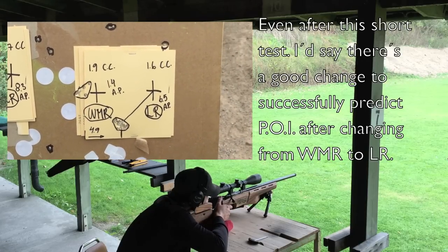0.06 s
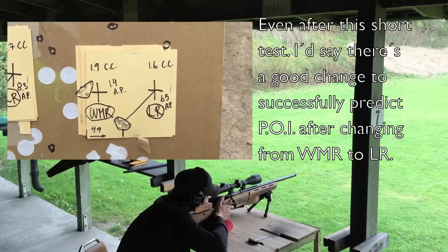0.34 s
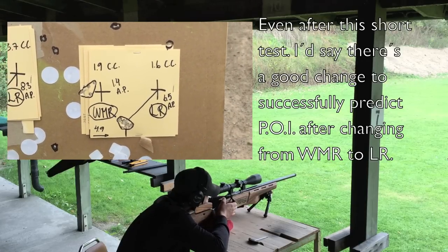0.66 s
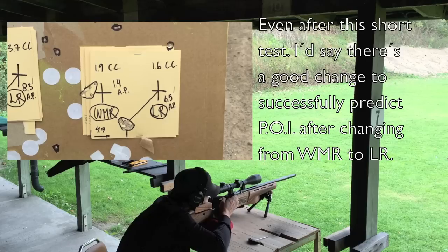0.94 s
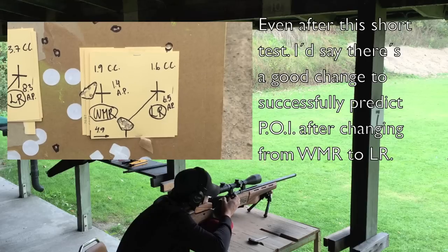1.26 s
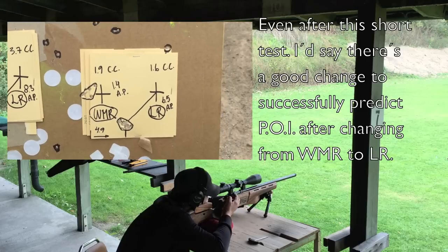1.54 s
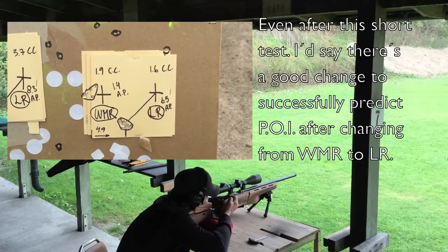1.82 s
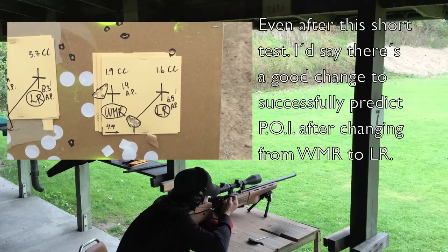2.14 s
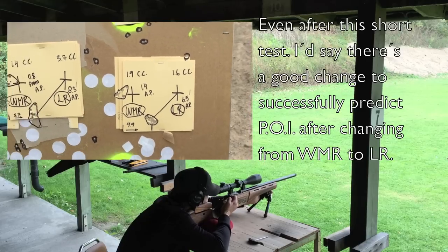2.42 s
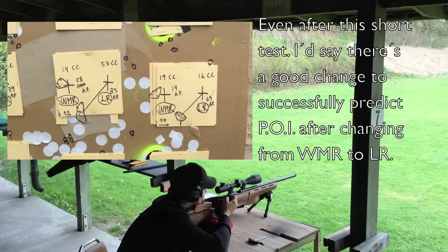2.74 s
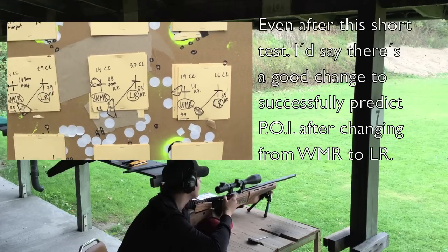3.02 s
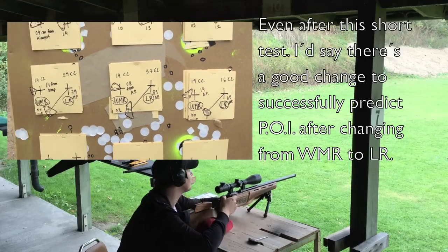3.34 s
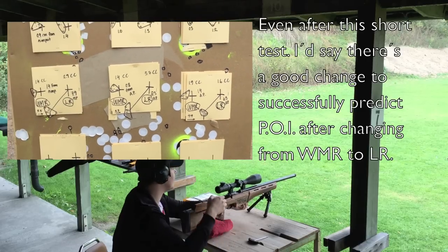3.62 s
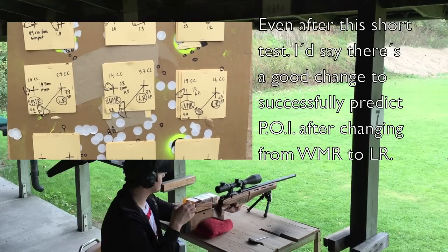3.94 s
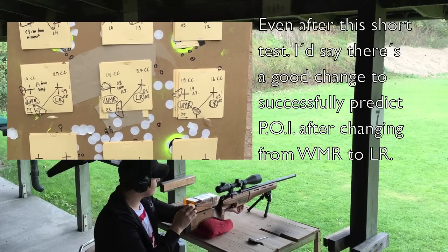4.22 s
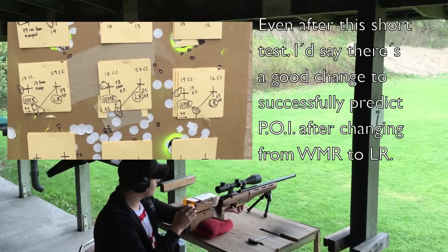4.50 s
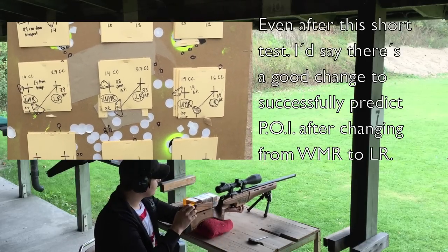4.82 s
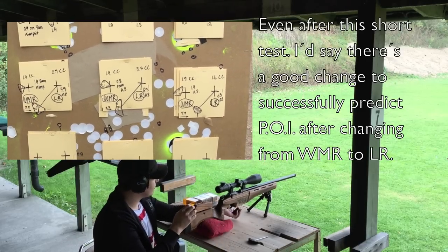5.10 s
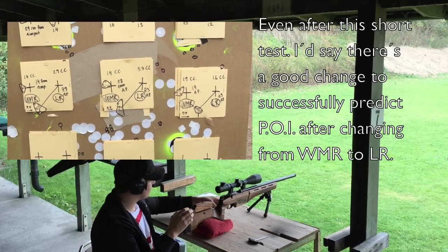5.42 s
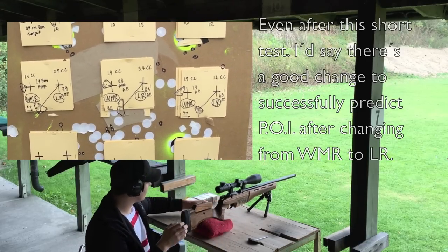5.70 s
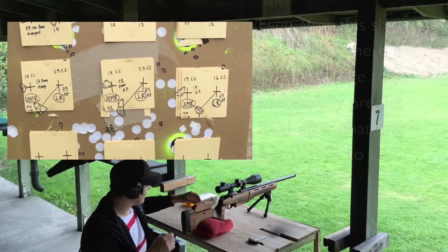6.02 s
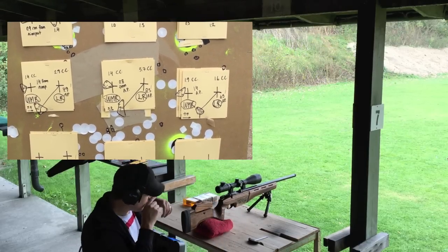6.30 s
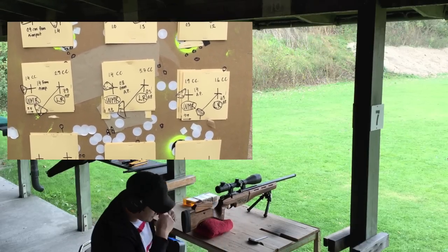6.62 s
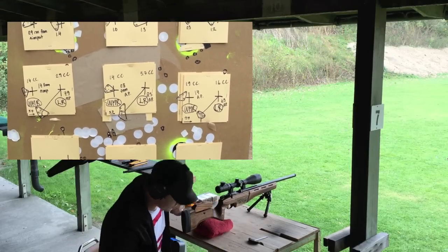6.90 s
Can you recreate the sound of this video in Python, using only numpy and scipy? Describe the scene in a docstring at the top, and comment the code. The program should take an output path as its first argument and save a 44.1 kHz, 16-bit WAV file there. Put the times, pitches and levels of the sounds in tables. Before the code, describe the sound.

A small-bore rifle closes with crisp metal clicks and fires once, its crack trailing over an open field as a fainter impact comes back. The bolt opens with light, high jingles, followed by soft cartridge ticks and ringing magazine clicks. A firm knock on wood comes next, and last a sleeve rustles and a chair thuds and scrapes. A quiet outdoor rumble runs underneath, heard from near the sheltered bench.

```python
"""One shot from a small-bore bolt rifle on a bench under the roof of an outdoor range.
An earlier shot's echo fades over a low, steady rumble. The stock slides on its sandbag and steel parts
click shut. The shot cracks, and the bullet smacks into the far backstop. The bolt opens with a thin ring,
a squeak and light jingles. Cartridges tick, the magazine clicks and something is put down on the bench.
Last, a sleeve brushes past and a chair scrapes over concrete as the shooter gets up."""
import sys
import numpy as np
from scipy import signal
from scipy.fft import rfft, irfft, next_fast_len
from scipy.io import wavfile
from scipy.ndimage import map_coordinates

SR = 44100
rng = np.random.default_rng(int(sys.argv[2]) if len(sys.argv) > 2 else 0)


def inscribe(sig):
    """Save sig as 16-bit PCM at rate SR to the path in sys.argv[1].

    A 1-D sig is mono; a 2-D sig holds one channel per row.
    Samples are clipped to [-1, 1] before scaling.
    """
    pcm = np.round(np.clip(np.atleast_2d(sig).T, -1, 1) * 32767)
    wavfile.write(sys.argv[1], SR, pcm.astype(np.int16))


N = 311076
TIME = np.arange(N) / SR
TAIL_SAMPLES = 2 ** 16

# Hits on each object. Each row: start in seconds, level in dB, chatter time in seconds,
# bass change in dB, treble change in dB, amount of ringing, room sound in dB relative to the hit.
SHOT_HITS = [(1.7546, -13.5, 0.0056, 0, 3, 1, -2)]
BACKSTOP_HITS = [(2.0719, -27, 0.0034, 0, 0, 0.49, 0)]
ACTION_HITS = [(.8205, -51.5, 0.0062, 3.5, -10, 0.48, -2.5), (.945, -61, 0.014, 7, -18.5, 0.81, 2),
               (.975, -35, 0.0071, -6, -3.5, 1, -5.5), (.9797, -23.5, 0.00046, -1, 3, 0.94, -2.5),
               (.9822, -23, 0.0008, 2.5, 1, 0.97, -2), (1.7127, -48.5, 0.013, 0.5, -5.5, 1, 2),
               (1.7265, -34.5, 0.0046, 0, -12.5, 0.41, 4)]  # the action is the rifle's moving steel parts
CATCH_HITS = [(1.1001, -39, .004, 0.006, 9.5, 0.53, -1.5), (1.1035, -40, .002, 0, -4, 0.96, -4.5)]
BOLT_HITS = [(2.6137, -31, 0.00062, -1, -10, 0.46, -0.5), (2.617, -36, 0.0009, -2, 22, 0.52, 12.5),
             (2.626, -33, 0.0029, -5, 16, 0.63, -4), (2.904, -38, 0.00023, -23, -21, 2.1, -2),
             (3.0288, -48.5, 0.0013, -12, -20, 2.9, -1), (3.0492, -58, 0.0019, 8, -43, 2.7, 5.5),
             (3.1315, -47.5, 0.0015, -23, -7, 0.7, 3), (3.2, -59.5, .07, -5, -11, 0.28, 7.5)]
CARTRIDGE_HITS = [(4.6595, -56.5, .008, 3, 3.5, .7, 0), (4.686, -57.5, 0.0093, 10, -51, 1.3, 0),
                  (4.834, -63.5, 0.019, 14, 3, 0.8, 3), (4.8676, -59, 0.0023, -10, 1, 1.7, -1),
                  (4.881, -56, .004, -24, -9, 1.8, -3.5), (4.9414, -61.5, 0.0046, -4, -8, 0.9, 2)]
MAGAZINE_HITS = [(4.9696, -37.5, 0.00049, -11.5, -4.5, 1.71, 1.5),
                 (4.9723, -33.5, 0.0034, -2.5, 18, 3.3, -5)]
FOLLOWER_HITS = [(5.0427, -43, .001, -0.016, 0, 1, 0), (5.0725, -42, .0015, -1, 0, 0.99, -6.5)]  # the follower is the plate on the magazine spring
BENCH_HITS = [(3.636, -60, 0.0076, 17.5, -17, 0.93, -4), (5.7846, -43.5, 0.0037, 13, -1.5, 0.84, 3),
              (5.797, -45.5, 0.0025, 17, -12.5, 1, 6.5), (5.8389, -37.5, 0.037, 17, -11, 1, -1.5),
              (5.8823, -21, 0.00082, -20, -24, 0.39, -6), (5.8845, -26, 0.0028, 8.5, 1.5, 0.7, 3),
              (6.842, -58, 0.017, 19, -5, 0.34, -4)]  # wood, from bench top to chair leg

# The notes each object rings at. Each row: pitch in Hz, width in Hz, boost in dB at a ringing amount of 1.
BARREL_NOTES = [(826.3, 95, 4.5), (1083, 82, 6.5), (1790, 40, 5), (1917, 78, 4.5), (2440, 110, 4.5),
                (2590, 60, 4.5), (3300, 35, 2.5), (4317, 40, 7.5), (4500, 31, 7.5), (6360, 48, 5)]
BACKSTOP_NOTES = [(558, 32, 4.9), (915, 78, 7.7), (2130, 160, 1.1), (2684, 110, 5.2), (5250, 89, 3.9),
                  (6400, 400, 3.8), (11150, 68, 27)]
ACTION_NOTES = [(630, 35, 9.9), (1780, 230, 7.8), (2149, 60, 3), (3060, 160, 6.5), (3580, 130, 3),
                (4440, 180, 4)]
CATCH_NOTES = [(2320, 150, 5), (3450, 200, 5.1), (4440, 150, 4), (5974, 350, 11), (7430, 300, 4.8)]
BOLT_NOTES = [(1730, 76, 9.4), (2370, 46, 2.2), (3074, 88, 9.4), (9200, 310, 8.2), (11300, 28, 12)]
CARTRIDGE_NOTES = [(1695, 100, 8.4), (4130, 290, 7.2), (4600, 140, 7.1), (5960, 150, 7.3), (7100, 340, 3.3)]
MAGAZINE_NOTES = [(1048, 44, 7.7), (1363, 29, 11.8), (2590, 69, 14), (2710, 50, 3.4), (2990, 51, 11.7),
                  (4070, 130, 5.6), (5200, 130, 6.7), (6760, 200, 5.2)]
FOLLOWER_NOTES = [(646, 32, 19), (1915, 26, 13.7), (4390, 225, 5.26), (8440, 320, 5.6), (10900, 60, 11)]
BENCH_NOTES = [(316, 43.2, 4.9), (524, 68, 1.3), (802, 31, 3.9), (1210, 60, 2), (1390, 60, 1.1),
               (2341, 90, 3), (2780, 100, 1.6), (4390, 235, 10.2), (8070, 350, 4.3), (11260, 340, 12.8)]
# The chair frame's notes and the far hums. Each row: pitch in Hz, width in Hz, base level in dB.
CHAIR_NOTES = [(250, 22, 8), (530, 42, 0), (1130, 61, -1), (1970, 180, 1.5), (2580, 90, -23)]
HUM_NOTES = [(71.34, 11, -57.5), (201.5, 7.3, -59.5)]

# The tone of each source, from bass to treble. Each row: frequency in Hz, relative level in dB.
SHOT_TONE = [(120, -30.5), (200, -22), (450, -19), (700, -15.5), (1080, -8), (1450, -12.5), (1950, 0),
             (2600, -4), (3500, -7.5), (8000, -9.5), (12000, -12), (15500, -14.5)]
BACKSTOP_TONE = [(210, -30), (350, -19), (474, -28), (539, -13.5), (643, -17), (928, -13), (1120, -11.5),
                 (1300, -8.5), (2170, -5), (3130, -11), (5220, -11), (9590, -34.5), (11400, -27),
                 (14800, -29), (16000, -34)]
ACTION_TONE = [(200, -33.5), (350, -12.5), (480, -24.5), (640, -12.5), (850, -14), (1300, -6.5),
               (1800, -6.5), (2700, -11.5), (3400, -6), (5000, -11), (7000, -7.5), (10500, -10),
               (15500, -8)]
CATCH_TONE = [(880, -46), (1500, -18), (2160, -1), (2830, -9), (3380, -0.5), (4920, -12.5), (6060, -4),
              (14800, -19.5), (16000, -32)]
BOLT_TONE = [(410, -40), (700, -29), (841, -25), (934, -44), (1020, -29), (1770, -22), (2990, -6.5),
             (3370, -10), (4920, -14), (14800, -1), (16000, 8)]
CARTRIDGE_TONE = [(500, -35), (1000, -5), (1800, 0.5), (2600, -3), (4500, -5.5), (9000, -14.5),
                  (15500, -19)]
MAGAZINE_TONE = [(400, -51), (650, -20.5), (850, -16.5), (1250, 2.5), (1650, -2), (2000, -2.5),
                 (2800, -7.5), (3500, -11.5), (4500, -9.5), (7000, -23.5), (10400, -19), (15500, -38)]
FOLLOWER_TONE = [(450, -32.5), (650, -14), (850, -14.5), (1200, 7), (2000, 0), (3200, -6), (4500, -2.5),
                 (8500, -12), (15500, -22)]
BENCH_TONE = [(120, -35), (220, -9.5), (400, -14), (750, -12), (1080, -6), (1450, -1.5), (2100, -0.5),
              (3100, -3.5), (4200, -10), (5200, -13), (8000, -16), (11300, -23), (15500, -22)]
STOCK_TONE = [(350, -23), (600, -4), (800, -2), (1100, -1.5), (1700, -5), (2600, -13.5), (6000, -24.5),
              (12000, -45.5)]
SLEEVE_TONE = [(290, -34), (500, -14), (604, 1), (946, -6), (1030, -2), (6060, -13.5), (14700, -17),
               (16000, -18)]
SCRAPE_TONE = [(88, -31), (150, 2), (240, -2.5), (297, -4.5), (398, -9), (790, -15.5), (1140, -18),
               (1630, -16), (1790, -15), (3350, -15), (11900, -39), (14800, -55), (16000, -59)]
RUMBLE_TONE = [(20, -28), (32, -13), (42, 0.5), (60, 2), (76, 3.5), (100, -3.5), (130, -8.5), (170, -24),
               (260, -39.5), (420, -90)]
DRONE_TONE = [(88, -34.5), (150, -9.5), (172, -20), (182, -14), (195, -1.5), (222, 0), (303, 2.5),
              (339, -7), (438, -21), (520, -28), (680, -57), (1140, -120)]
AIR_TONE = [(260, -33), (450, -8.5), (607, -1), (818, -5.5), (1010, -5.5), (1890, -7.5), (2070, -8),
            (4430, -13.5), (5790, -15), (10400, -18.5), (13400, -21), (15300, -20.5), (16000, -40.5)]
ECHO_TONE = [(240, -54), (400, -0.5), (515, -6), (654, -0.5), (770, -1.5), (2420, -0.5), (3510, -4),
             (6960, -19), (10900, -37), (14000, -68)]

# Sounds that swell and fade smoothly. Each row: middle in seconds, level in dB, half length in seconds.
BOLT_SQUEAK = [(2.986, -61.5, 0.017)]
STOCK_SLIDES = [(.45, -64.5, 0.049), (.79, -71.5, 0.063), (3.3, -73, 0.14), (3.498, -62.5, 0.065)]
SLEEVE_BRUSHES = [(6.655, -67, 0.09), (6.752, -57.5, 0.027), (6.825, -67, 0.024)]
RUMBLE_RISES = [(1.75, -55.5, 0.22), (2.9, -55, 0.2), (3.85, -55.5, 0.55)]

# Jolts that set something shaking. Each row: time of the peak in seconds, level in dB.
THIN_RINGS = [(2.63, -53), (2.945, -76), (3.032, -74), (3.092, -67), (3.138, -71), (3.203, -66),
              (3.24, -68), (3.335, -77), (3.39, -75), (3.47, -80)]
SPRING_JOLTS = [(5.085, -44.5)]
CHAIR_SHOVES = [(6.844, -41.5), (6.914, -42), (7.001, -42)]
CHAIR_GROANS = [(6.875, -42), (6.922, -45), (7.004, -38), (7.05, -38)]

# Thuds through bench and floor. Each row: start in seconds, peak in dB, first pitch in Hz,
# swell time in seconds.
LOW_THUDS = [(1.743, -37, 140, 0.014), (6.8406, -18.5, 128, 0.012), (6.914, -25, 123, 0.014)]
# Nearby surfaces throw the sound back. Each row: delay in seconds, boost in dB.
NEAR_ECHOES = [(.0036, 7.3), (0.0119, 6), (0.058, 4)]
# How sound dies under the roof and over the field. Each row: frequency in Hz, seconds to fade by 60 dB.
SHELTER_FADE = [(200, 0.41), (1000, 0.42), (2000, 0.34), (4000, 0.32), (8000, .31), (15000, 0.16)]
FIELD_FADE = [(200, 1.1), (1000, 1.5), (2500, 1.4), (6000, .9), (15000, 0.37)]


def firing():
    """The muzzle cracks, then the smack of the bullet comes back from the backstop."""
    return hits(SHOT_HITS, SHOT_TONE, BARREL_NOTES) + hits(BACKSTOP_HITS, BACKSTOP_TONE, BACKSTOP_NOTES)


def action():
    """Steel parts click and ring; a catch snaps in after they close."""
    return hits(ACTION_HITS, ACTION_TONE, ACTION_NOTES) + hits(CATCH_HITS, CATCH_TONE, CATCH_NOTES)


def bolt():
    """The bolt clacks open and squeaks once in its track."""
    return hits(BOLT_HITS, BOLT_TONE, BOLT_NOTES) + singing(swells(BOLT_SQUEAK), hz=2380, width_hz=360)


def thin_ring():
    """A thin, high ring sounds as the bolt opens, then in light jingles."""
    return singing(jolts(THIN_RINGS, rise_s=0.006, decay_s=0.042), hz=11100, width_hz=90)


def cartridges():
    """Loose cartridges tick together."""
    return hits(CARTRIDGE_HITS, CARTRIDGE_TONE, CARTRIDGE_NOTES)


def magazine():
    """The magazine and its follower click, and the shaken spring sings on."""
    spring = singing(jolts(SPRING_JOLTS, rise_s=0.044, decay_s=0.041), hz=1920, width_hz=140)
    body = hits(MAGAZINE_HITS, MAGAZINE_TONE, MAGAZINE_NOTES)
    return spring + body + hits(FOLLOWER_HITS, FOLLOWER_TONE, FOLLOWER_NOTES)


def bench():
    """Things knock on wood, and the rifle's stock slides on its sandbag."""
    knocks = hits(BENCH_HITS, BENCH_TONE, BENCH_NOTES)
    return knocks + rubbing(swells(STOCK_SLIDES), STOCK_TONE, slips_per_s=6500, grab_db=1.5)


def chair():
    """At each shove the legs grind over concrete and shake the frame, which groans in short fits."""
    shoves = jolts(CHAIR_SHOVES, rise_s=0.003, decay_s=0.21)
    legs = rubbing(shoves, SCRAPE_TONE, slips_per_s=21000, grab_db=1.5)
    frame = sum(from_db(db + 2 * drift(25)) * resonance(legs, hz, width) for hz, width, db in CHAIR_NOTES)
    groan = singing(jolts(CHAIR_GROANS, rise_s=0.0097, decay_s=0.016), hz=1290, width_hz=540)
    return legs + frame + groan


def thuds(sag_s=0.023):
    """Bench and floor thud with the shot and the chair, sinking in pitch as the load eases."""
    out, t = np.zeros(N), TIME[:TAIL_SAMPLES]
    for start_s, db, hz, swell_s in LOW_THUDS:
        swell = t * np.exp(-(t / swell_s) ** 2 / 2)
        cycles = hz * sag_s * np.log1p(t / sag_s)
        add(out, start_s, -from_db(db) * swell / swell.max() * np.cos(2 * np.pi * cycles))
    return out


def sleeve():
    """Cloth rubs softly as a sleeve brushes past."""
    return rubbing(swells(SLEEVE_BRUSHES), SLEEVE_TONE, slips_per_s=9400, grab_db=1)


def shelter(build_s=0.0012, smear_s=0.0021):
    """The echo under the roof, bunched where bench, posts and roof throw the sound back."""
    t = TIME[:TAIL_SAMPLES // 4]
    bunching_db = sum(db * np.exp(-((t - delay_s) / smear_s) ** 2) for delay_s, db in NEAR_ECHOES)
    build_up = 1 - np.exp(-t / build_s)
    return energy_one(dying_noise(SHELTER_FADE, size=len(t)) * from_db(bunching_db) * build_up)


def field_echo(sound):
    """The long tail a sound leaves over the open field."""
    return signal.fftconvolve(sound, energy_one(dying_noise(FIELD_FADE)))[:N]


def earlier_echo(opening_db=-53, opening_s=0.13):
    """The echo of an earlier shot dies away over the field."""
    out = np.zeros(N)
    echo = coloured(dying_noise(FIELD_FADE), ECHO_TONE)
    add(out, 0, from_db(opening_db) * echo / np.std(echo[:round(opening_s * SR)]))
    return out


def outdoors(rumble_db=-54, flutter_db=3.5, drone_db=-56.5, air_db=-70.5):
    """A far rumble flutters and swells, along with wavering hums, a low drone and faint air."""
    flutter = from_db(flutter_db * drift(9))
    rumble = (from_db(rumble_db) + swells(RUMBLE_RISES)) * flutter * noise(RUMBLE_TONE)
    hums = sum(from_db(db) * rms_one(resonance(rng.standard_normal(N), hz, width))
               for hz, width, db in HUM_NOTES)
    hums = signal.sosfilt(signal.butter(2, 300, fs=SR, output="sos"), hums)  # muffled above 300 Hz
    return rumble + hums + from_db(drone_db) * noise(DRONE_TONE) + from_db(air_db) * noise(AIR_TONE)


def hits(rows, tone, notes, bass_hz=900, middle_hz=3000, treble_hz=13000, level_span_s=0.006):
    """Each hit, brighter for a harder contact, rings the object and gets its own echo under the roof."""
    out = np.zeros(N)
    for start_s, db, chatter_s, bass_db, treble_db, ring, room_db in rows:
        hardness = [(bass_hz, bass_db), (middle_hz, 0), (treble_hz, treble_db)]
        body = ringing(coloured(contact(chatter_s), tone, hardness), notes, ring)
        # As much energy as a steady sound at this level lasting level_span_s.
        direct = from_db(db) * np.sqrt(level_span_s * SR) * energy_one(body)
        add(out, start_s, direct)
        add(out, start_s, from_db(room_db) * signal.fftconvolve(direct, shelter()))
    return out


def contact(chatter_s, snap=0.25, spread=3.2):
    """A first snap and a burst of tiny bounces, about equally strong at all frequencies."""
    t = TIME[:TAIL_SAMPLES // 4]
    burst = energy_one(rng.standard_normal(len(t)) * np.exp(-t / chatter_s))
    burst[0] += snap
    evened = irfft(np.exp(1j * np.angle(rfft(burst))))
    return evened * np.exp(-(t / (spread * chatter_s)) ** 2)


def ringing(x, notes, amount):
    """A sound plus the notes it sets ringing in an object."""
    return x + amount * sum((from_db(db) - 1) * resonance(x, hz, width) for hz, width, db in notes)


def rubbing(gain, tone, slips_per_s, grab_db, grabs_per_s=70):
    """Two surfaces make many tiny slips, grabbing and letting go unevenly."""
    slips = rng.standard_normal(N) * (rng.random(N) < slips_per_s / SR)
    grip = from_db(grab_db * drift(grabs_per_s))
    return gain * rms_one(coloured(slips * grip, tone))


def singing(gain, hz, width_hz):
    """One metal note kept going by small rattles."""
    note = resonance(rng.standard_normal(N), hz, width_hz)
    return gain * rms_one(resonance(note, hz, 2 * width_hz))


def swells(rows):
    """Loudness over time that rises and falls in bell shapes."""
    return sum(from_db(db) * np.exp(-((TIME - s) / half_s) ** 2) for s, db, half_s in rows)


def jolts(rows, rise_s, decay_s):
    """Loudness over time of something jolted: each jolt builds up and dies, and their energies add."""
    gains = (from_db(db) * np.exp(-np.maximum((s - TIME) / rise_s, (TIME - s) / decay_s)) for s, db in rows)
    return np.sqrt(sum(gain ** 2 for gain in gains))


def resonance(x, hz, width_hz):
    """Let through one pitch and its close neighbours; a narrower width rings longer."""
    r = np.exp(-np.pi * width_hz / SR)
    feedback = [1, -2 * r * np.cos(2 * np.pi * hz / SR), r * r]
    return signal.lfilter(np.array([1, 0, -1]) * (1 - r * r) / 2, feedback, x + 1e-18)


def coloured(x, *tones):
    """Shape a sound's bass and treble by the sum of the given tone tables."""
    size = next_fast_len(len(x) // 2 + 1) * 2
    hz = np.arange(size // 2 + 1) * SR / size
    gain = from_db(sum(at_hz(tone, hz) for tone in tones))
    # Folding the cepstrum makes a minimum-phase filter: nothing sounds before the hit.
    cepstrum = irfft(np.log(gain))
    cepstrum[1:size // 2] *= 2
    cepstrum[size // 2 + 1:] = 0
    return irfft(rfft(x, size) * np.exp(rfft(cepstrum)))[:len(x)]


def noise(tone):
    """Steady noise with the given tone, at level 1."""
    return rms_one(coloured(rng.standard_normal(N), tone))


def dying_noise(fades, size=TAIL_SAMPLES):
    """Hiss in which each octave fades at its own speed."""
    t, hz = TIME[:size], np.arange(size // 2 + 1) * SR / size
    white = rfft(rng.standard_normal(size))
    centres = 125 * 2. ** np.arange(8)
    bands = [irfft(white * at_hz(np.c_[centres, centres == c], hz)) for c in centres]
    return sum(band * from_db(-60 * t / at_hz(fades, c)) for band, c in zip(bands, centres))


def drift(turns_per_s):
    """A smooth random wobble with a typical size of 1."""
    steps = rng.standard_normal(N // 64)
    return rms_one(map_coordinates(steps, [TIME * turns_per_s], order=3, mode="wrap"))


def at_hz(points, hz):
    """Read between a table's rows, with octaves evenly spaced."""
    row_hz, value = np.transpose(points)
    return np.interp(np.log(np.maximum(hz, 1)), np.log(row_hz), value)


def add(out, start_s, sound):
    """Mix a sound in at a given time."""
    at = round(start_s * SR)
    out[at:at + len(sound)] += sound[:N - at]


def from_db(db):
    """Turn decibels into a multiplier."""
    return 10 ** (np.asarray(db) / 20)


def rms_one(x):
    """Scale to an average (rms) level of 1."""
    return x / np.sqrt(np.mean(x ** 2) + 1e-20)


def energy_one(x):
    """Scale to a total energy of 1."""
    return x / np.sqrt(np.sum(x ** 2) + 1e-20)


def scene(field_db=-28, handling_outwards_db=-14):
    """Everything heard at the bench, in mono; the muzzle points outwards, so it wakes the field most."""
    shot = firing()
    handling = action() + bolt() + thin_ring() + cartridges() + magazine() + bench()
    tail = from_db(field_db) * field_echo(shot + from_db(handling_outwards_db) * handling)
    return (shot + handling + tail + sleeve() + chair() + thuds() + outdoors() + earlier_echo())[None]


def record(dry, dip_hz=10400, dip_width_hz=600, dip_depth=0.41, cutoff_hz=15500):
    """The microphone has a narrow dip in the treble, and the very top is cut off."""
    heard = dry - dip_depth * resonance(dry, dip_hz, dip_width_hz)
    return signal.sosfilt(signal.ellip(10, .2, 70, cutoff_hz, fs=SR, output="sos"), heard)


dry = scene()
out = record(dry)
inscribe(out)
```